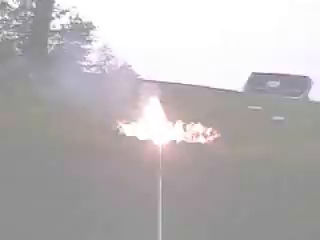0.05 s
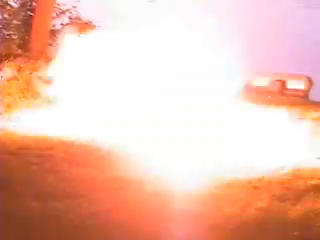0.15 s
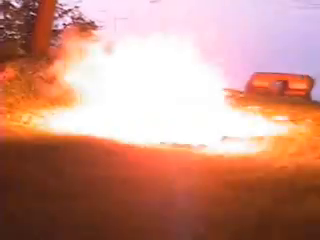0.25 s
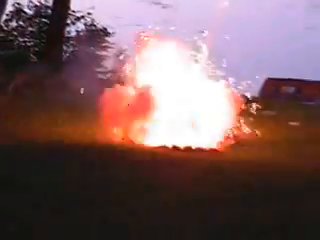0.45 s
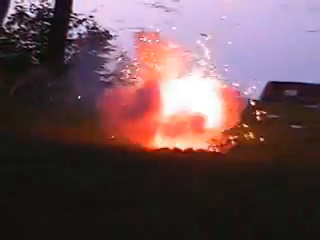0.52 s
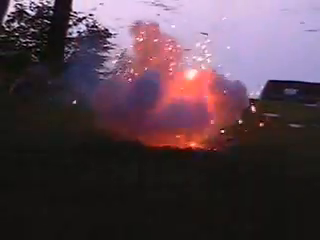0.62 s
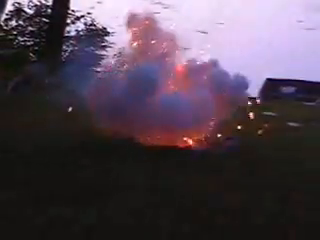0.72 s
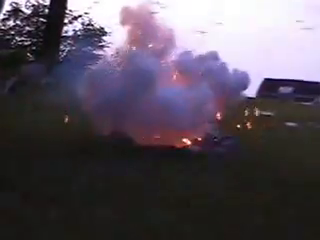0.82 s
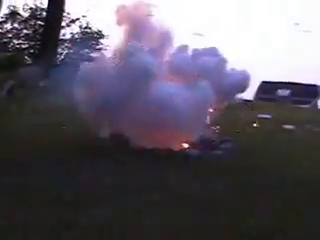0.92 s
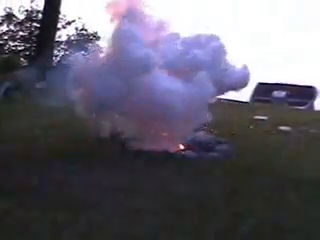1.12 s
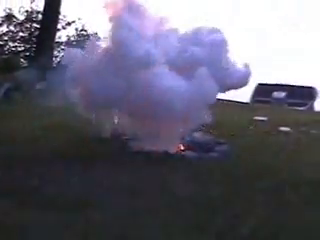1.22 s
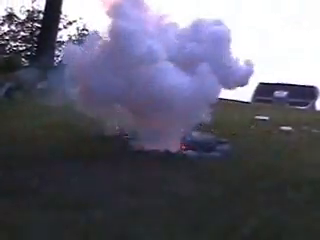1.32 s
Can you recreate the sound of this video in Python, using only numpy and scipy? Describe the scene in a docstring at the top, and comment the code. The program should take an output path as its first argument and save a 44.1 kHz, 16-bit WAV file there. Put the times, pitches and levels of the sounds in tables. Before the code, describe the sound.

An explosion of a small powder charge on open grass. Quiet evening air and faint camera whine and ticking come first; from about 0.1 seconds a burning hiss rises. At 0.24 a single sharp, clipped bang hits, with crackle and short low boom. Echoes roll mostly from the left, with hissy scatter from trees, fading unevenly by about 1 second. Soft low thumps on the right follow until 1.3.

```python
"""Flash-powder charge on a lawn at dusk

A small charge goes off near a tape camcorder. Burning powder hisses up to a bang made of inverted pressure
fronts, crackle, ground spikes and a low-passed noise boom, which overloads the microphones. Shaped noise gives
the low echoes, mostly from the left, the treble scattered by trees, and the evening air. Soft low thumps sound
on the right; sines make the camera motor's whine and buzz, and short tone bursts its tick."""
import sys
import numpy as np
from scipy import signal
from scipy.fft import rfft, irfft, next_fast_len
from scipy.io import wavfile
from scipy.ndimage import uniform_filter1d

SR = 44100
rng = np.random.default_rng(int(sys.argv[2]) if len(sys.argv) > 2 else 0)


def wav_record(signal):
    """Record a signal, one row per channel, as 16-bit PCM in the file named by sys.argv[1]."""
    frames = np.transpose(np.atleast_2d(signal))
    bounded = np.clip(frames, -1, 1)
    # unit amplitude maps onto the largest positive 16-bit level
    quanta = np.round(bounded * 32767).astype(np.int16)
    wavfile.write(sys.argv[1], SR, quanta)


N = 59535
T = np.arange(N) / SR  # seconds

# All levels are those ahead of the overload in record(); a pan is left over right.
BANG_S = .2357
# Pressure fronts, left then right. Each row: arrival in seconds, push time constant in seconds,
# level in dB one time constant after arrival, recoil frequency in Hz.
FRONTS = [(.2357, .0005, 4, 150), (.2359, .001, 1, 125)]
RECOIL_DB, RECOIL_T60_S = -11, .14
CRACK_DB, CRACK_RISE_S, CRACK_FALL_S = -5, .0009, .0011  # rms level before the envelope, 1/e times
# Spectrum of the crackle. Each row: frequency in Hz, relative level in dB per Hz.
CRACK_COLOUR = [(600, -49), (1300, -12), (2200, -8), (3100, 12.5), (4500, -26), (6000, 21), (7200, -17),
                (8500, 13.5), (10000, -19.5), (11800, 7.5), (13000, -37)]
# Direction of the crackle. Each row: frequency in Hz, pan in dB.
CRACK_PAN = [(3000, 8), (8000, 4), (12000, 5)]
# Near reflections of the front. Each row: time in seconds, peak level in dB.
GROUND_SPIKES = [(.2379, -5), (.2436, -16), (.2458, -20)]
SPIKE_S = .00005  # 1/e half-width
BOOM_DB, BOOM_T60_S, BOOM_RISE_S, BOOM_TOP_HZ = -14, .13, .027, 269

# Powder catching fire. Each row: time in seconds, rms level in dB.
FLARE_LEVEL = [(.1, -64.5), (.15, -55.5), (.19, -46), (.21, -40.5), (.224, -29), (.231, -32.5),
               (.236, -1.5)]
# Spectrum of the hiss. Each row: frequency in Hz, relative level in dB per Hz.
FLARE_COLOUR = [(120, -10), (200, 4.5), (1050, -2.5), (1440, -20), (1540, -6), (1870, -4.5), (3210, 0),
                (4640, -13.5), (5060, -3.5), (11700, -15), (13000, -40)]
# Direction of the hiss. Each row: frequency in Hz, pan in dB.
FLARE_PAN = [(300, 9), (1500, 23), (4000, 10.5), (8000, -1), (12000, 4)]

# Low echoes. Each row: time in seconds, relative level in dB.
ROLL_LEVEL = [(0.25, -17), (0.402, -22.5), (0.418, -21.5), (0.43, -20.5), (0.644, -33), (0.656, -29),
              (0.748, -29.5), (0.758, -37), (0.788, -34), (0.8, -27), (0.89, -40.5), (0.898, -33),
              (0.962, -38.5), (1.036, -38), (1.106, -43), (1.35, -48)]
# Spectrum of the low echoes at the bang. Each row: frequency in Hz, relative level in dB per Hz.
ROLL_COLOUR = [(88, -9), (150, -2.5), (237, -5.5), (304, -0.5), (380, -3), (475, -8), (780, -7),
               (986, -14.5), (1420, -16.5), (2500, -25), (3250, -52), (5500, -120)]
# Direction of the low echoes. Each row: frequency in Hz, pan in dB.
ROLL_PAN = [(100, 19), (300, 24.4), (700, 24.7), (2000, 12.7)]
# Left-right correlation of the low and deepest echoes. Each row: frequency in Hz, correlation from 0 to 1.
ROLL_ALIKE = [(60, 0.24), (280, 1), (600, 0.98), (1300, .1)]
# Drift of the low echoes' spectrum. Each row: frequency in Hz, slope in dB per second.
ROLL_DRIFT = [(150, -6.5), (400, 1.5), (800, -9.5), (2000, -14.5)]
# Deepest echoes. Each row: time in seconds, level in dB.
DEEP_LEVEL = [(0.26, -19.5), (0.308, -32.5), (0.404, -37.5), (0.456, -27.5), (0.492, -38), (0.508, -35.5),
              (0.638, -57), (0.656, -40.5), (0.712, -30.5), (0.732, -56.5), (0.77, -25.5), (0.936, -66),
              (0.966, -30), (0.996, -59), (1.082, -50), (1.178, -81.5), (1.198, -54), (1.35, -66)]
# Spectrum of the deepest echoes. Each row: frequency in Hz, relative level in dB per Hz.
DEEP_COLOUR = [(18, -13.5), (30, -1.5), (50, 3), (75, 16), (120, 14.5), (170, -6), (260, -73)]
# Direction of the deepest echoes. Each row: frequency in Hz, pan in dB.
DEEP_PAN = [(40, 1.8), (150, 12)]

# Treble scattered by trees. Each row: time in seconds, relative level in dB.
TREES_LEVEL = [(0.245, -36), (0.279, -35), (0.291, -31), (0.567, -42.5), (0.573, -44), (0.901, -55.5),
               (0.95, -59)]
# Spectrum of the scatter at the bang. Each row: frequency in Hz, relative level in dB per Hz.
TREES_COLOUR = [(400, -31.5), (900, -4.5), (1500, -4.5), (3000, -1), (5000, -3), (8000, -6), (11300, -7.5),
                (11900, -56.5)]
# Direction of the scatter. Each row: frequency in Hz, pan in dB.
TREES_PAN = [(1000, 48), (2500, 11.5), (5000, 8), (10000, 3.5)]
# Drift of the scatter's spectrum. Each row: frequency in Hz, slope in dB per second.
TREES_DRIFT = [(1000, 24.5), (2500, 8.5), (5000, -7), (7000, -19.5), (9000, -24.5), (11500, -67)]
TREES_GAIN_DB, TREES_FADE_DB_PER_S = 3, -37.5  # added to all rows; fade after the last row

# Soft low thumps. Each row: centre in seconds, frequency in Hz, level of the envelope in dB.
THUMPS = [(0.086, 77, -48.5), (0.97, 69.5, -45), (1.085, 48.5, -38.5), (1.155, 53.3, -46),
          (1.212, 44, -44.5)]
THUMP_LONG_S, THUMP_PAN_DB = .019, -29  # 1/e half-width
MOTOR_HZ, MOTOR_PAN_DB = 149.83, -11
# Whine of the head motor. Each row: multiple of the motor frequency, rms level in dB, mean of both sides.
WHINE = [(4, -66), (6, -70), (8, -61), (9, -62), (10, -64), (12, -63), (14, -77), (16, -77), (24, -72)]
# Motor buzz in the treble. Each row: frequency in Hz, rms level in dB of each even multiple there.
BUZZ = [(3000, -89), (4500, -76.5), (6000, -83), (8000, -87), (11000, -99)]
# Tones of the tick. Each row: frequency in Hz, middle level of the envelope in dB.
TICK = [(2850, -84.5), (3825, -59), (4750, -78)]
TICK_S, TICK_GAP_S = .0265, 1.001 / 30  # one tick time, and the gap: once per picture frame
TICK_LONG_S, TICK_SCATTER_DB, TICK_PAN_DB = .0045, 2, -6  # 1/e half-width
EVENING_DB = -54.5  # rms
# Spectrum of the evening air. Each row: frequency in Hz, relative level in dB per Hz.
EVENING_COLOUR = [(15, -38.5), (25, 11.5), (422, -0.5), (625, 3.5), (750, 1), (975, -0.5), (1560, 2.5),
                  (2030, -9.5), (2700, -12), (3800, -16.5), (9250, -28.5), (12000, -39), (13000, -47)]
# Left-right correlation of the evening air. Each row: frequency in Hz, correlation from 0 to 1.
EVENING_ALIKE = [(100, 0), (2000, 0), (5000, 1), (12000, .75)]

FULL, SQUEEZED, KNEE = 1.01, .39, 4  # ceilings before and after the grab, sharpness of the bend
GRAB_S, LOUD = .0015, .72  # smoothing time, smoothed level where the grab begins
COUPLING_HZ, TOP_HZ = 20, 13300


def amp(db):
    """Decibel law: amplitude is ten to the power dB / 20."""
    return 10 ** (np.asarray(db) / 20)


def unit(x):
    """Normalisation to an rms of 1."""
    return x / np.sqrt(np.mean(x ** 2) + 1e-20)


def along(points, hz):
    """Interpolation of (Hz, value) points on a logarithmic frequency axis."""
    f, v = np.transpose(points)
    return np.interp(np.log(hz + 1), np.log(f + 1), v)


def level(rows):
    """Envelope from (s, dB) rows, linear in dB and silent before the first."""
    s, db = np.transpose(rows)
    return amp(np.interp(T, s, db, left=-150))


def level_from_bang(rows):
    """Envelope whose first level also holds from the bang to the first row."""
    return level([(BANG_S, rows[0][1])] + list(rows))


def sides(pan_db):
    """Level-difference panning: left and right gains whose mean is 1."""
    g = amp(pan_db)
    return 2 * np.array([g, np.ones_like(g)]) / (1 + g)


def filtered(x, response):
    """Linear filtering: the spectrum times a complex response of frequency."""
    m = next_fast_len(N + SR // 2)
    return irfft(rfft(x, m) * response(np.fft.rfftfreq(m, 1 / SR)), m)[..., :N]


def rush(colour, alike, pan, patchy_db, slope=None):
    """Partly coherent stereo noise: random patches, mid rms 1, colour drifting by slope after the bang."""
    hz, t, z = signal.stft(rng.standard_normal((2, N)), SR, nperseg=256)
    field = uniform_filter1d(rng.standard_normal(z.shape[1:]), size=5, axis=0)
    field = uniform_filter1d(field, size=8, axis=1)
    gain_db = patchy_db * unit(field)
    if slope is not None:
        gain_db = gain_db + along(slope, hz)[:, None] * np.maximum(t - BANG_S, 0)
    pair = signal.istft(z * amp(gain_db), SR, nperseg=256)[1][:, :N]

    def shared_and_opposed(f):
        angle = np.arccos(np.clip(along(alike, f), -1, 1)) / 2  # cos(2 angle) is the correlation
        return amp(along(colour, f)) * np.array([np.cos(angle), np.sin(angle)])

    shared, opposed = filtered(pair, shared_and_opposed)
    both = filtered(np.array([shared + opposed, shared - opposed]), lambda f: sides(along(pan, f)))
    span = N if slope is None else SR // 3  # drifting noise is normalised over its opening third of a second
    return both / np.sqrt(np.mean(both.mean(0)[:span] ** 2))


def pressure_front():
    """Blast wave: a short inverted push and its overshoot, then the air swings back as a damped sine."""
    arrive, length, level_db, recoil_hz = np.transpose(FRONTS)[..., None]
    u = np.maximum(T - arrive, 0) / length
    push = -amp(level_db) * u * (2 - u) * np.exp(1 - u)
    later = np.maximum(T - arrive - 2 * length, 0)
    recoil = amp(RECOIL_DB - 60 * later / RECOIL_T60_S) * np.sin(2 * np.pi * recoil_hz * later)
    return push + recoil


def crackle():
    """Noise burst: exponential rise and fall around the front."""
    after, before = np.maximum(T - BANG_S, 0), np.maximum(BANG_S - T, 0)
    shape = np.exp(-after / CRACK_FALL_S - before / CRACK_RISE_S)
    return amp(CRACK_DB) * shape * rush(CRACK_COLOUR, [(100, 0.92)], CRACK_PAN, patchy_db=1)


def ground_reflections():
    """Early reflection: the ground returns the front as narrow Gaussian spikes."""
    return sum(amp(db) * np.exp(-((T - s) / SPIKE_S) ** 2) for s, db in GROUND_SPIKES)


def near_boom():
    """Exponential decay: low-passed noise close by, independent on the two sides."""
    t = np.maximum(T - BANG_S, 0)
    noise = rng.standard_normal((2, N))
    dull = filtered(noise, lambda f: 1 / (1 + (f / BOOM_TOP_HZ) ** 2) * f / (f + 40))
    rise = np.minimum(t / BOOM_RISE_S, 1) ** 2
    return amp(BOOM_DB - 60 * t / BOOM_T60_S) * rise * unit(dull)


def bang():
    """Superposition: front, crackle, ground spikes and boom add as pressures."""
    return pressure_front() + crackle() + ground_reflections() + near_boom()


def flare():
    """Combustion noise: burning powder hisses ever more loudly, but for one brief dip, up to the bang."""
    hiss = rush(FLARE_COLOUR, [(100, 0.3)], FLARE_PAN, patchy_db=-2)
    return level(FLARE_LEVEL) * (T < FLARE_LEVEL[-1][0]) * hiss


def low_echoes():
    """Distant reflection: obstacles return the low bands as a rolling noise."""
    rise = np.clip((T - BANG_S) / .01, 0, 1) ** 2
    roll = rush(ROLL_COLOUR, ROLL_ALIKE, ROLL_PAN, patchy_db=1, slope=ROLL_DRIFT)
    deep = rush(DEEP_COLOUR, ROLL_ALIKE, DEEP_PAN, patchy_db=0)
    return rise * (level_from_bang(ROLL_LEVEL) * roll + level_from_bang(DEEP_LEVEL) * deep)


def tree_scatter():
    """Scattering: trees return treble noise whose spectrum drifts, the highest part fading fastest."""
    fade_db = TREES_GAIN_DB + TREES_FADE_DB_PER_S * np.maximum(T - TREES_LEVEL[-1][0], 0)
    scatter = rush(TREES_COLOUR, [(100, 0.15)], TREES_PAN, patchy_db=-0.2, slope=TREES_DRIFT)
    return (T > BANG_S) * amp(fade_db) * level_from_bang(TREES_LEVEL) * scatter


def thumps():
    """Tone bursts: low sines under Gaussian envelopes, on the right."""
    mono = 0
    for s, hz, db in THUMPS:
        mono = mono + amp(db) * np.exp(-((T - s) / THUMP_LONG_S) ** 2) * np.sin(2 * np.pi * hz * (T - s))
    return sides(THUMP_PAN_DB)[:, None] * mono


def motor_whine():
    """Harmonic series: steady multiples of the head motor's frequency in random phase."""
    mono = 0
    for multiple, db in WHINE:
        cycles = multiple * MOTOR_HZ * T + rng.random()
        mono = mono + np.sqrt(2) * amp(db) * np.sin(2 * np.pi * cycles)
    return sides(MOTOR_PAN_DB)[:, None] * mono


def motor_buzz():
    """Dense harmonics: high even multiples of the motor frequency, equal on both sides."""
    even_hz = 2 * MOTOR_HZ * np.arange(10, 38)
    cycles = even_hz[:, None] * T + rng.random((len(even_hz), 1))
    return np.sqrt(2) * amp(along(BUZZ, even_hz)) @ np.sin(2 * np.pi * cycles)


def motor_tick():
    """Periodic tone bursts: Gaussian pulses of sines, each tone's level scattered from tick to tick."""
    frame = np.round((T - TICK_S) / TICK_GAP_S).astype(int)
    beat = np.exp(-((T - TICK_S - frame * TICK_GAP_S) / TICK_LONG_S) ** 2)
    sizes = rng.standard_normal((frame.max() + 2, len(TICK)))
    mono = 0
    for k, (hz, db) in enumerate(TICK):
        mono = mono + amp(db + TICK_SCATTER_DB * sizes[frame, k]) * beat * np.sin(2 * np.pi * hz * T)
    return sides(TICK_PAN_DB)[:, None] * mono


def evening_air():
    """Ambient noise: a patchy, mostly low rush, independent on the two sides below the treble."""
    return amp(EVENING_DB) * rush(EVENING_COLOUR, EVENING_ALIKE, [(100, 0)], patchy_db=2.5)


def scene():
    """Superposition of the charge, its echoes, the evening and the camera."""
    charge = flare() + bang() + low_echoes() + tree_scatter()
    evening = evening_air() + thumps()
    camera = motor_whine() + motor_buzz() + motor_tick()
    return charge + evening + camera


def record(dry):
    """Overload: a limiter passes the first front, then its soft ceiling drops after loud sound and stays down."""
    keep = np.exp(-1 / (GRAB_S * SR))
    smoothed = signal.lfilter([1 - keep], [1, -keep], np.abs(dry).max(0))
    loudest_yet = np.maximum.accumulate(smoothed)
    grab = np.clip(2 * (loudest_yet / LOUD - 1), 0, 1)
    ceiling = FULL + (SQUEEZED - FULL) * grab
    limited = dry / (1 + np.abs(dry / ceiling) ** KNEE) ** (1 / KNEE)
    coupled = filtered(limited, lambda hz: 1j * hz / (COUPLING_HZ + 1j * hz))  # first-order high-pass
    return filtered(np.clip(coupled, -FULL, FULL), lambda hz: hz < TOP_HZ)


dry = scene()
out = record(dry)
wav_record(out)
```